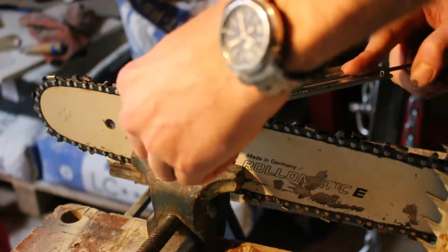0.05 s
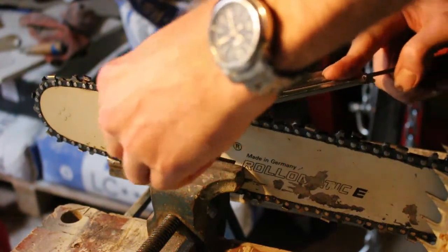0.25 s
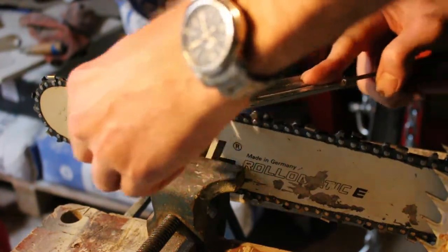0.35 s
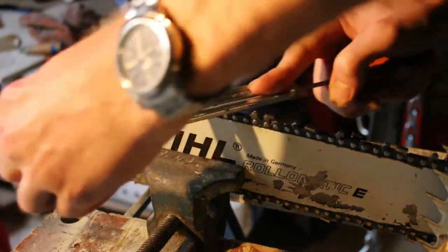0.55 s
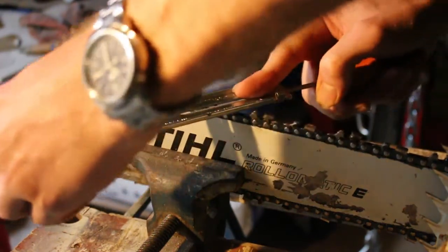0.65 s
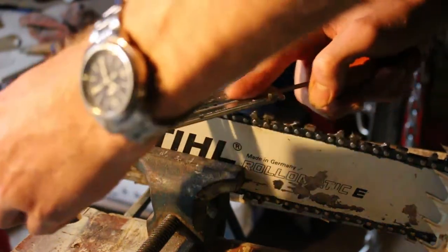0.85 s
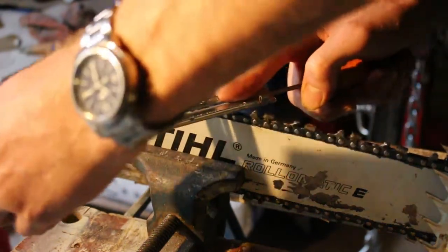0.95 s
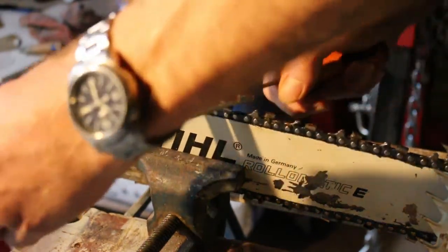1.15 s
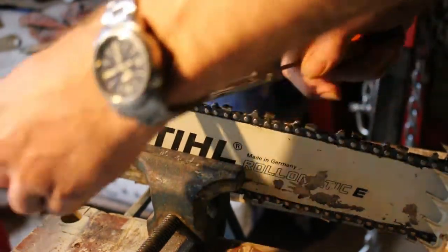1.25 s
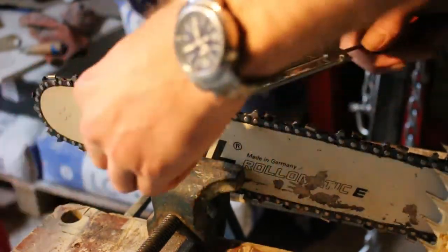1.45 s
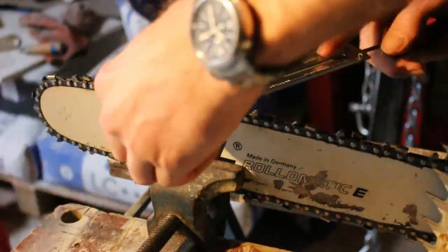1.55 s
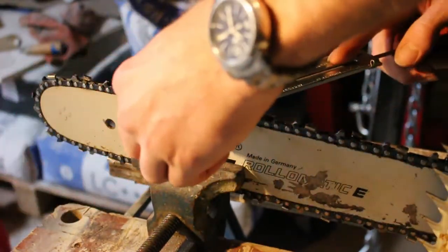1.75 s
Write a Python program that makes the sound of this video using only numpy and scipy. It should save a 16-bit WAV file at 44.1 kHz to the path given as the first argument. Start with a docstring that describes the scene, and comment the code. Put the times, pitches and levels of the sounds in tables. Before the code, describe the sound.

Close up in a quiet workshop, a steel file scrapes a clamped chainsaw chain twice, making the bar ring slightly as the links click. Then the file brushes lightly over the metal and taps twice.

```python
"""In a quiet workshop, a round file is pushed over a chain cutter on a guide bar held in a vice,
then dragged back in light scrapes. The file's teeth catch the cutter one by one and make the bar ring.
Steel grit hisses and makes the file ring too. File and chain links give small knocks.
Underneath are a low rumble from the bench, a short echo and the faint noise of the room."""
import sys
import numpy as np
from scipy import signal
from scipy.fft import rfft, irfft, next_fast_len
from scipy.io import wavfile
from scipy.ndimage import uniform_filter1d

SR = 44100
rng = np.random.default_rng(int(sys.argv[2]) if len(sys.argv) > 2 else 0)


def inscribe(sig):
    """Save sig as 16-bit PCM at rate SR to the path in sys.argv[1].

    A 1-D sig is mono; a 2-D sig holds one channel per row.
    Samples are clipped to [-1, 1] before scaling.
    """
    pcm = np.round(np.clip(np.atleast_2d(sig).T, -1, 1) * 32767)
    wavfile.write(sys.argv[1], SR, pcm.astype(np.int16))


N = 79380
T = np.arange(N) / SR

# How loud the filing is, one list per stroke.
# Each row: time in seconds, then the relative levels of tooth thumps, grit and grit treble in dB.
STROKES = [
    [(0.0, -44, -43, -58), (0.056, -75, -54.5, -71), (0.118, -63, -50.5, -75), (0.184, -33, -48.5, -48),
     (0.22, -26, -28.5, -37), (0.262, -30, -34, -38.5), (0.282, -22.5, -28.5, -34),
     (0.3, -27.5, -27, -34.5), (0.442, -24.5, -25, -32.5), (0.448, -22, -17.5, -27),
     (0.462, -22.5, -18, -31), (0.476, -23.5, -18.5, -27), (0.508, -17, -25, -30.5), (0.554, -27, -28, -40),
     (0.574, -29.5, -26, -22.5), (0.582, -27.5, -28, -33.5), (0.636, -27, -34.5, -38),
     (0.674, -42, -49.5, -80), (0.782, -63.5, -63, -74), (0.81, -66, -57, -79)],
    [(0.815, -55, -48, -60), (0.819, -28, -50, -47), (0.837, -19, -32.5, -38.5), (0.849, -19, -36, -39),
     (0.885, -21.5, -24.5, -32.5), (0.911, -27.5, -32, -40.5), (0.949, -42, -49, -67),
     (0.979, -42.5, -50, -82), (0.987, -48, -50, -61), (0.997, -33, -42, -46.5), (1.023, -23, -37, -42.5),
     (1.035, -30.5, -33.5, -39), (1.061, -24, -30.5, -38), (1.111, -39.5, -38, -59), (1.131, -41, -41, -42),
     (1.143, -37, -42.5, -55), (1.151, -42, -40, -38.5), (1.197, -59, -50.5, -80), (1.341, -67, -58, -66),
     (1.345, -52, -56, -71.5)],
]
# A light skim and two taps, one list each, with the same columns.
SKIMS = [
    [(1.353, -40, -31, -53), (1.371, -36.5, -41, -40.5), (1.381, -39.5, -34, -39.5), (1.433, -48, -35, -45),
     (1.523, -70.5, -84, -79), (1.64, -74, -78, -74)],
    [(1.651, -42.5, -39, -44), (1.657, -44, -51, -61), (1.695, -61.5, -61, -73), (1.711, -63, -71, -74),
     (1.753, -64, -84, -71), (1.755, -68, -70, -74)],
    [(1.762, -40, -37, -43), (1.768, -39.5, -45.5, -66), (1.778, -58, -55, -70), (1.8, -58, -54, -73)],
]
# The hush just before each light touch, with the same columns.
HUSHES = [(1.3495, -61, -57, -52), (1.647, -61, -61, -72), (1.758, -81, -79, -84)]
# How fast teeth pass. Each row: time in seconds, teeth per second, unevenness from 0 to 1.
TOOTH_RATE = [(.14, 197.2, .15), (.22, 331.5, 0.17), (.28, 448.8, 0.15), (.35, 456.8, .05),
              (.43, 477.8, .05), (.46, 602.4, 0.15), (.53, 610.4, .06), (.59, 483, .12), (.66, 289.2, .2),
              (.82, 229.6, 0.31), (.89, 260, 0.27), (.95, 219.2, 0.38), (1.0, 301.6, .25),
              (1.06, 369.7, 0.15), (1.15, 326.7, .3), (1.36, 270.5, 0.38), (1.44, 437.3, 0.37),
              (1.8, 401, .3)]
# The tones of the clamped bar. Each row: pitch in Hz, level in dB, seconds to fade by 60 dB.
BAR_TONES = [(226, -7.5, 0.077), (260, -8.5, 0.055), (381, -8, 0.035), (460.5, -3.5, 0.04),
             (491.3, -2, 0.05), (616, -3.5, 0.025), (648.5, -11.5, 0.059), (885, -4.5, 0.082),
             (927.4, 0.5, 0.057), (968.6, 1.5, 0.079), (1024, -2.5, 0.04), (1258, -3, 0.071),
             (1384, -9, 0.15), (1650, -2.5, 0.031), (1830, -6.5, 0.051), (2090, -2.5, 0.012)]
# The tones of file and holder, damped by the hands pressing them down, with the same columns.
HELD_FILE_TONES = [(1696, 1.5, .02), (2245, 2, 0.01), (2731, 0.5, 0.015), (3344, -0.5, 0.011),
                   (4230, -17.5, 0.018), (5455, 0, 0.0046), (6840, -7, 0.01), (7753, -8, 0.0023),
                   (9296, -12, .015), (9810, -11.5, 0.0044), (11390, -15.5, 0.015), (12800, -11, 0.0033),
                   (14630, -15, 0.015)]
# The longer tones of the file ringing freely, with the same columns.
FREE_FILE_TONES = [(1350, 0, .1), (2143, -2, .12), (3090, -2, .1), (3265, -3, .12), (3760, -5, .1),
                   (4226, -4, .16), (5500, -4, .07), (6720, -8, .1), (7434, -8, .18), (7710, -7, .04),
                   (8230, -7, .08), (8510, -6, .07), (9160, -9, .06), (10600, -14, .07), (12900, -13, .06),
                   (14780, -10, .07)]
# The tone colour of the grit. Each row: frequency in Hz, level in dB.
GRIT_COLOUR = [(350, -11), (600, 0.5), (717, -11), (944, -10), (1490, -10), (1800, -25.5), (3890, -14),
               (5480, -16), (16000, -31.5)]
# Knocks of file and links. Each row: start in seconds, relative level in dB, relative treble in dB,
# blow to the bar in dB compared with that knock's level, fade time in seconds.
KNOCKS = [(0.1, -45.5, -57, -17, 0.001), (0.2, -29, -39, 17, .001), (.214, -25.5, -52, -2, 0.0006),
          (0.2805, -18, -41, 2, 0.00087), (.376, -17, -25, -2, 0.0011), (0.4483, -20, -17.5, -27, 0.0021),
          (0.4727, -5, -17, 2, .0005), (0.5, -13.5, -26, -17, 0.0011), (0.5116, -11, -24, 1, .0005),
          (0.5286, -14, -20.5, 0, 0.00091), (0.5558, -19, -25.5, 13, 0.0018), (0.5698, -14, -26, 8, 0.0015),
          (0.7994, -41, -58, -9, 0.00067), (0.8217, -38, -34, 2, .001), (.8322, -29, -27, 9, 0.00069),
          (.8368, -18.5, -18, 5, 0.00079), (0.9699, -35.5, -60, -10, .001), (0.996, -34, -43, 15, .001),
          (1.0225, -23.5, -32, -5, 0.0011), (1.116, -34, -40, -5, .0008), (1.1254, -35, -26, -9, 0.00054),
          (1.1324, -28, -44, -15, 0.00089), (1.152, -29.5, -44, 7, 0.0012),
          (1.3324, -52, -53, -16, 0.00059), (1.3518, -21.5, -35.5, -1, 0.0017),
          (1.3815, -29.5, -34, -19, .001), (1.649, -35, -44.5, -13, .001), (1.7603, -30, -44, 0, .001)]
# The tone colour of the workshop's noise. Each row: frequency in Hz, level in dB.
SHOP_COLOUR = [(15, -35), (25, -10), (166, -8), (270, -6), (335, -14), (1100, -25.5), (3250, -19.5),
               (6050, -30.5), (8360, -24.5), (16000, -25.5)]
# The tone colour of the noise that sets left and right apart. Each row: frequency in Hz, level in dB.
SIDE_COLOUR = [(18, -41.5), (30, 3), (245, -1.5), (2540, -11), (5040, -3), (9220, -4.5), (10200, -19),
               (12600, -22), (16000, 2.5)]

PUSH_S = .00016  # how quickly one push on the bar dies away
LIFTED_S = 1.33  # from here on the file only skims and can ring freely


def tooth_thumps(teeth_passed, level):
    """Each tooth catches the cutter with its own strength, so the bar thuds and rings."""
    scatter_db = 4 * rng.standard_normal(N)
    catches = np.diff(np.floor(teeth_passed), prepend=0) * undb(scatter_db)
    pushes = -np.convolve(catches, np.exp(-T[:400] / PUSH_S) * T[:400])[:N]
    thud = lambda x: band(x, 161, 1500)
    bar = lambda x: ring(x, BAR_TONES)
    body = lambda x: bar(x) * gain(pushes, bar) + undb(-2.5) * thud(x) * gain(pushes, thud)
    return body(pushes * level) * gain(pushes, body)


def steel_grit(teeth_passed, level, treble_level):
    """Grit hisses, loudest just after each tooth catches, and makes the file ring."""
    grains_per_s, split_hz = 2300, 4700
    grains = (rng.random(N) < grains_per_s / SR) * undb(4 * np.minimum(rng.exponential(size=N), 4))
    tooth_pulse = 1 - .29 * (teeth_passed % 1)
    grit = rng.standard_normal(N) * (1 + grains) * tooth_pulse
    grit *= undb(1.5 * wander(43))  # the level flickers
    flips = rng.choice([-1., 1.], N)  # random signs keep the ringing unlike the hiss
    hiss = lambda x: band(colour(x, GRIT_COLOUR), 420, 18000)
    held = lambda x: ring(x * flips, HELD_FILE_TONES)
    free = lambda x: ring(x, FREE_FILE_TONES)
    steel = lambda x: hiss(x) * gain(grit, hiss) + undb(1) * held(x) * gain(grit, held)
    lows = cut(steel(grit * level), 3, split_hz, "low")
    highs = cut(steel(grit * treble_level * undb(5.5)), 3, split_hz, "high")
    free_ring = undb(-4) * free(grit * level * (T > LIFTED_S)) * gain(grit, free)
    return (lows + highs) * gain(grit, steel) + free_ring


def knocks():
    """File and chain links knock: short cracks, dull or bright, that ring the file and the bar."""
    dull, bright, blows = np.zeros((3, N + 900))
    t = T[:900]
    for start_s, db, treble_db, bar_db, fade_s in KNOCKS:
        i = int(start_s * SR)
        burst = rng.standard_normal(900) * np.exp(-t / fade_s)
        burst *= np.sqrt(fade_s * SR / 2 / np.sum(burst ** 2))  # longer cracks carry more energy
        dull[i:i + 900] += burst * undb(db)
        bright[i:i + 900] += burst * undb(treble_db + 5.5)
        blows[i:i + 900] -= np.exp(-t / PUSH_S) * undb(db + bar_db)
    cracks = band(dull[:N], 1620, 4820) + band(bright[:N], 4500, 10000)
    return cracks + undb(-.5) * ring(cracks, HELD_FILE_TONES) + undb(-4.5) * ring(blows[:N], BAR_TONES)


def bench_rumble(level, lag_s=.059):
    """The bench rumbles, following the strength of the tooth thumps a little late."""
    low_noise = unit(band(rng.standard_normal(N), 39.7, 200))
    lag = np.exp(-1 / (lag_s * SR))
    return undb(-20) * low_noise * signal.lfilter([1 - lag], [1, -lag], level)


def room_echo(sound, fade_s=.33):
    """The workshop answers each sound with a short, dull echo."""
    n = SR // 2
    tail = unit(rng.standard_normal(n) * undb(-60 * T[:n] / fade_s))
    tail = cut(tail, 1, 3000, "low") / np.sqrt(n)
    return undb(-23) * signal.fftconvolve(sound, tail)[:N]


def shop_noise():
    """The faint, steady noise of the room."""
    return undb(-57.5) * unit(colour(rng.standard_normal(N), SHOP_COLOUR))


def side_noise(sound):
    """A very faint noise that sets left and right apart and swells gently with the sound."""
    swell = unit(uniform_filter1d(np.abs(sound), size=1024) ** .3)
    return undb(-68.5) * swell * unit(colour(rng.standard_normal(N), SIDE_COLOUR))


def ring(x, tones):
    """Let x set off fading tones, as a tap does in steel."""
    out = 0
    for k, (hz, db, fade_s) in enumerate(tones):
        decay = np.exp(-np.log(1000) / (fade_s * SR))
        angle = 2 * np.pi * hz / SR
        tone = signal.lfilter([0, np.sin(angle)], [1, -2 * decay * np.cos(angle), decay ** 2], x)
        out = out + (-1) ** k * undb(db) * np.sqrt(1 - decay) * tone
    return out


def colour(x, points):
    """Shape the lows and highs of x along a curve of (Hz, dB) points."""
    hz, db = np.array(points, float).T
    n = next_fast_len(len(x) + 4096)
    log_hz = np.log(np.maximum(np.fft.rfftfreq(n, 1 / SR), 1))
    return irfft(rfft(x, n) * undb(np.interp(log_hz, np.log(hz), db)), n)[:len(x)]


def cut(x, order, hz, keep):
    """Keep the "low", "high" or "band" part of x."""
    return signal.sosfilt(signal.butter(order, hz, keep, fs=SR, output="sos"), x)


def band(x, low_hz, high_hz):
    return cut(x, 2, [low_hz, high_hz], "band")


def curve(rows, column):
    """Join one column's values with straight lines over time."""
    rows = np.array(rows, float)
    return np.interp(T, rows[:, 0], rows[:, column])


def wander(rate_hz):
    """A smooth random drift, about 1 in size."""
    width = int(SR / rate_hz)
    return unit(uniform_filter1d(uniform_filter1d(rng.standard_normal(N), width), width))


def gain(x, shape):
    """The factor that brings shape(x) to an average (rms) level of 1."""
    return 1 / np.sqrt(np.mean(shape(x) ** 2))


def unit(x):
    return x / np.sqrt(np.mean(x ** 2))


def undb(db):
    return 10 ** (np.asarray(db) / 20)


def scene():
    """Move the file, add the knocks and the room, and return left and right."""
    rows = sorted([tuple(row) for part in STROKES + SKIMS + [HUSHES] for row in part])
    thump_level, grit_level, treble_level = (undb(curve(rows, column)) for column in (1, 2, 3))
    unevenness = np.maximum(1 + curve(TOOTH_RATE, 2) * wander(250), 0)
    teeth_passed = np.cumsum(curve(TOOTH_RATE, 1) * unevenness) / SR
    near = tooth_thumps(teeth_passed, thump_level) + bench_rumble(thump_level)
    near += steel_grit(teeth_passed, grit_level, treble_level) + knocks()
    middle = near + room_echo(near) + shop_noise()
    side = side_noise(middle)
    return np.array([middle + side, middle - side])


def record(dry):
    """The microphone loses the deepest bass, and the treble above 16000 Hz is cut off."""
    dry = cut(dry, 2, 35, "high")
    return signal.sosfilt(signal.ellip(10, .2, 70, 16000, fs=SR, output="sos"), dry)


dry = scene()
out = record(dry)
inscribe(out)
```